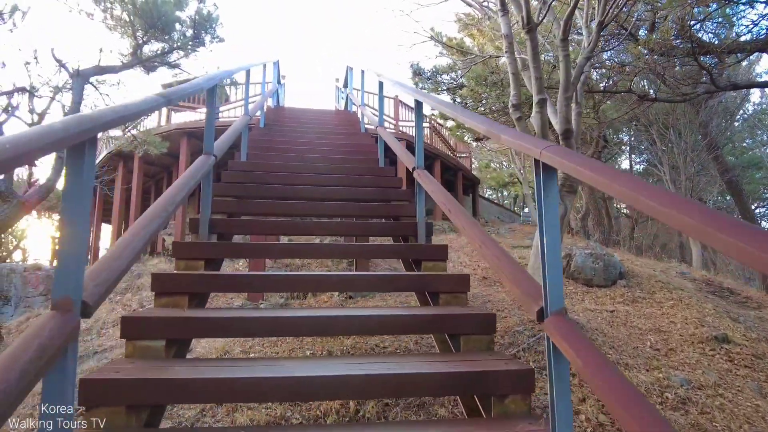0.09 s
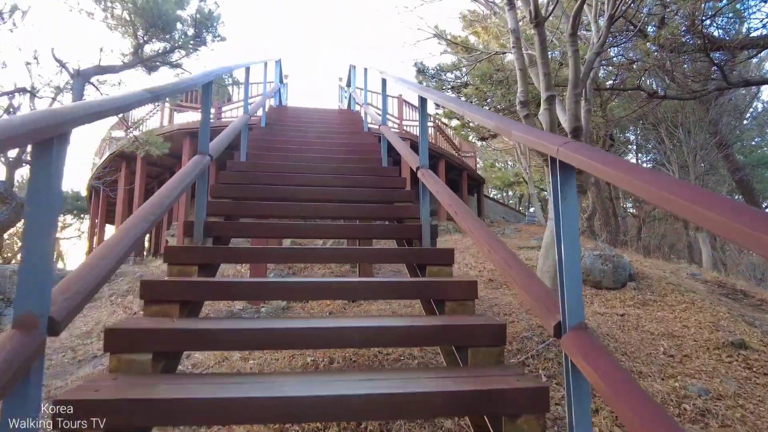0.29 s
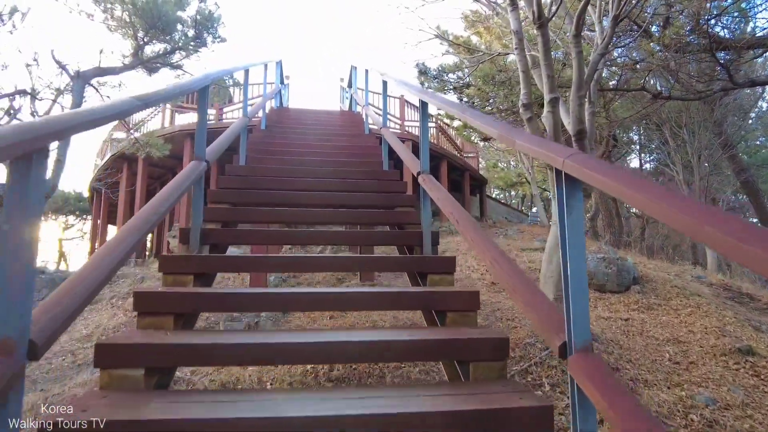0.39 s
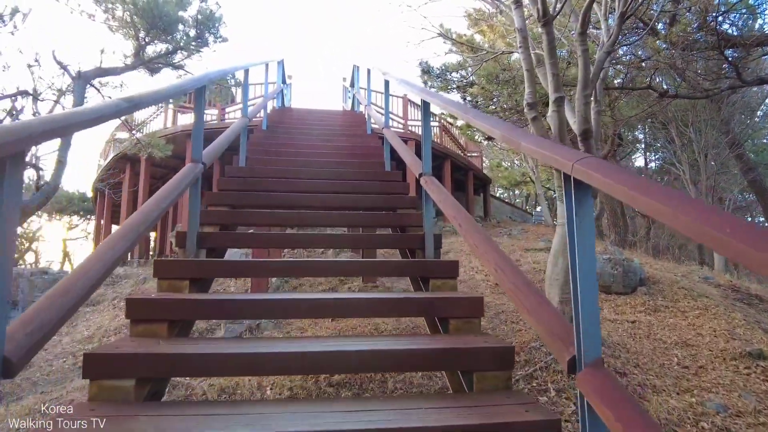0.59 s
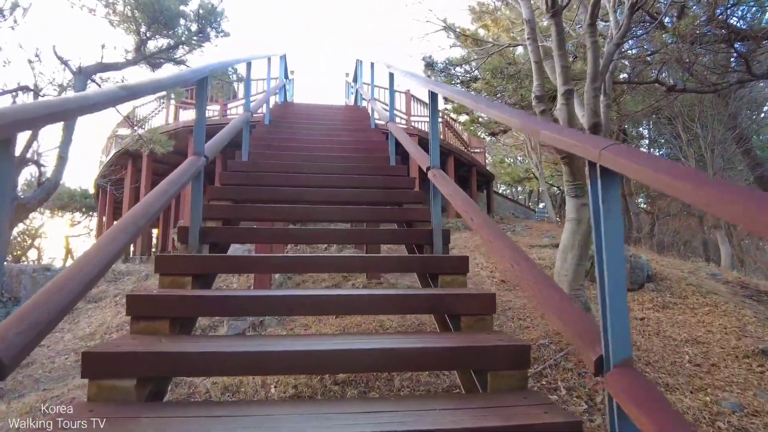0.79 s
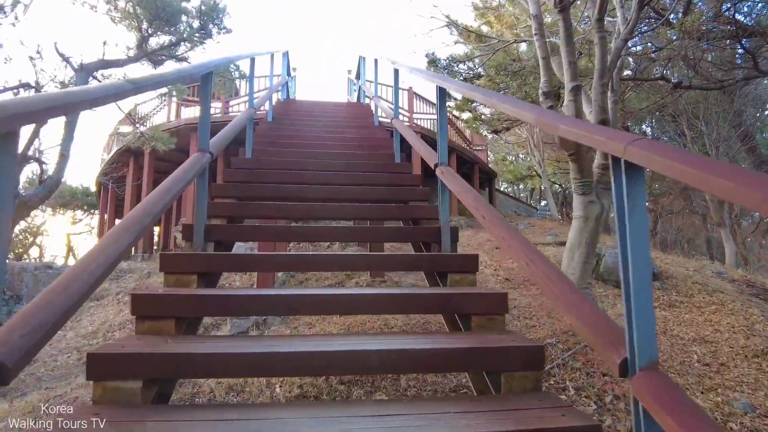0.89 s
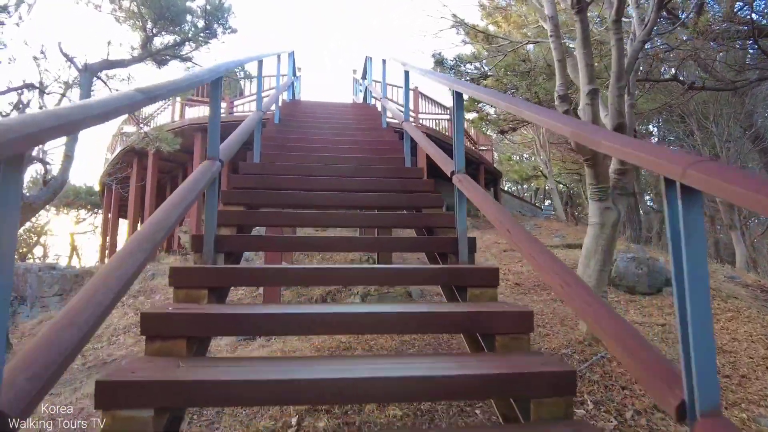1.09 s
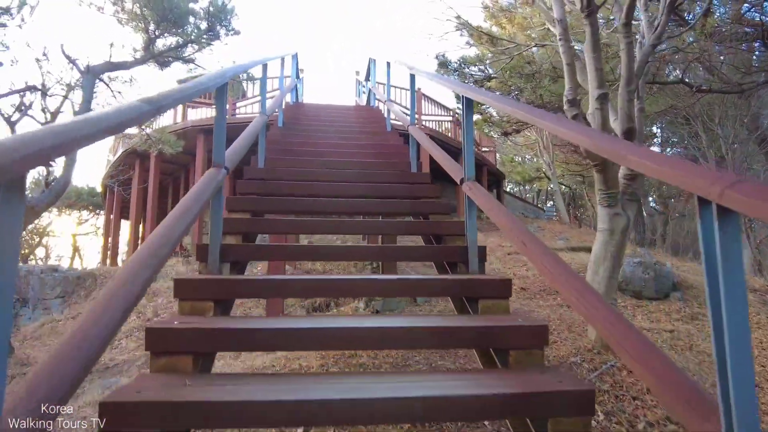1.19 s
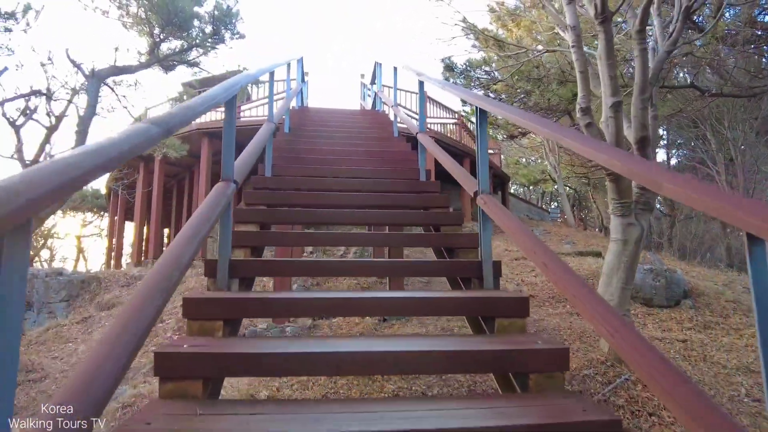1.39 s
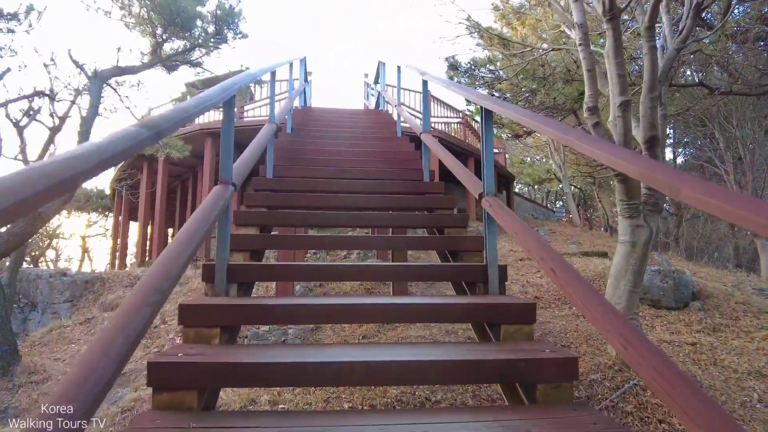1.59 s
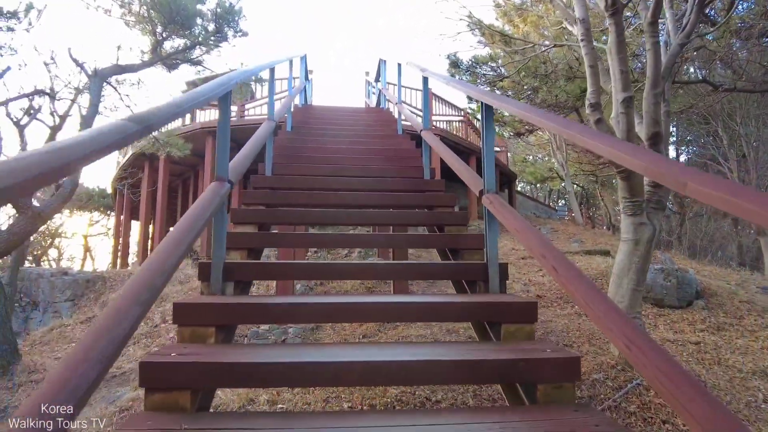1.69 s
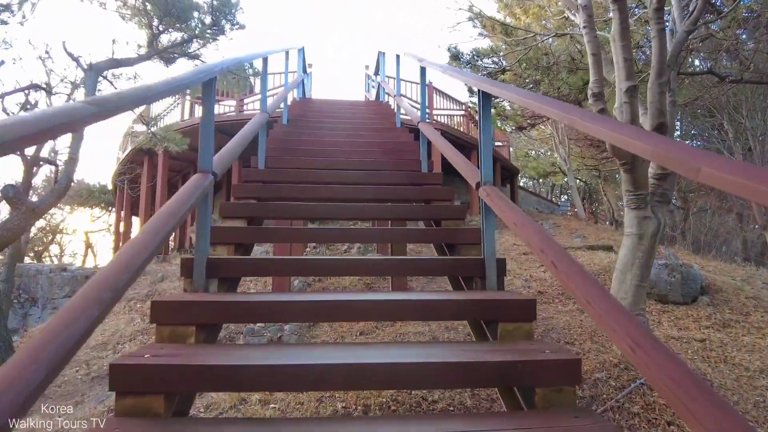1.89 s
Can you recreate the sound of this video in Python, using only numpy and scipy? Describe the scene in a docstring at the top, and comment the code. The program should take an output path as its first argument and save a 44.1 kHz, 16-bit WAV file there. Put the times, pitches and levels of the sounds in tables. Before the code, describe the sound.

Someone climbs open timber stairs on a hillside: a hollow knock, a softer duller one, then another solid one, with close fabric rustle, small gritty clicks and faint far rumble, heard from the walker's position.

```python
"""Boots climb an open wooden staircase on a hillside, heard by a stereo pair above the steps.
Each knock rings the hollow tread as damped modes with a noisy scuff; body weight booms the long beams.
Close by, trouser and jacket fabric swishes with the strides, as grainy noise of moving level and brightness.
Grit ticks in bursts a few cycles long, and shaped noise makes a far low rumble under faint air."""
import sys
import numpy as np
from scipy import signal
from scipy.fft import rfft, irfft, next_fast_len
from scipy.io import wavfile
from scipy.ndimage import uniform_filter1d, map_coordinates

SR = 44100
rng = np.random.default_rng(int(sys.argv[2]) if len(sys.argv) > 2 else 0)


def attenuation_scalar(level_db):
    """Turn a level in dB into a linear amplitude multiplier (20 dB per decade)."""
    decades = np.asarray(level_db, float) / 20
    return 10 ** decades


def to_wav(sig):
    """Store sig (one row per channel, or 1-D mono) as 16-bit WAV at the path in sys.argv[1].

    Samples outside -1..1 are clipped; the rate is SR.
    """
    pcm = np.clip(np.atleast_2d(sig), -1, 1) * 32767
    pcm = np.round(pcm).astype(np.int16)
    wavfile.write(sys.argv[1], SR, pcm.T)  # frames by channels


N = 83790  # length in samples, 1.9 s


def unit(x):
    """Scale to rms 1."""
    return x / np.sqrt(np.mean(x ** 2) + 1e-20)


def along(points, hz):
    """Read a curve of (Hz, value) points on a logarithmic frequency axis."""
    point_hz, value = np.transpose(points)
    return np.interp(np.log(hz + 1), np.log(point_hz + 1), value)


def filtered(x, response):
    """Multiply the spectrum of x by a complex response of frequency."""
    size = next_fast_len(N + SR // 2)
    spectrum = rfft(x, size) * response(np.fft.rfftfreq(size, 1 / SR))
    return irfft(spectrum, size)[..., :N]


def rush(spectrum, side_points, patchy_db, slope_db, treble_db):
    """Mid and side noise with random patches, a moving tilt (dB per octave about 3 kHz) and moving treble."""
    treble_hz = 8500
    u = np.arange(N) / SR
    hz, t, z = signal.stft(rng.standard_normal((2, N)), SR, nperseg=512)
    patches = uniform_filter1d(rng.standard_normal(z.shape[1:]), size=6, axis=0)
    patches = unit(uniform_filter1d(patches, size=6, axis=1))
    octaves = np.log2(np.clip(hz, 300, None) / 3000)
    tilt = np.outer(octaves, np.interp(t, u, slope_db))
    shelf = hz ** 6 / (hz ** 6 + treble_hz ** 6)
    treble = np.outer(shelf, np.interp(t, u, treble_db))
    pair = signal.istft(z * attenuation_scalar(patchy_db * patches + tilt + treble), nperseg=512)[1][:, :N]
    # The second row, the side, also takes the side-over-mid curve.
    pair = filtered(pair, lambda f: attenuation_scalar(along(spectrum, f) + np.outer([0, 1], along(side_points, f))))
    return pair / pair[0].std()


def rumble_and_air():
    """A far rumble over faint air noise: steady noise shaped in frequency and stereo width."""
    # Each row: frequency in Hz, relative density in dB per Hz.
    air_spectrum = [(12, -31), (20, -6), (64, 1), (78, -4.5), (92, -14), (202, -18.5), (238, -21.5),
                    (289, -28), (439, -25.5), (505, -33), (565, -37), (1160, -46), (1410, -41),
                    (1670, -44.5), (15500, -68)]
    # Stereo spread of the air. Each row: frequency in Hz, side over mid in dB.
    air_side = [(30, -38.5), (100, -41.5), (225, -26.5), (600, -13.5), (900, -7.5), (1400, -6.5),
                (2500, -5.5), (15000, -2)]
    still = np.zeros(N)
    mid, side = attenuation_scalar(-47.5) * rush(air_spectrum, air_side, patchy_db=0.0, slope_db=still, treble_db=still)
    return np.array([mid + side, mid - side])


def swish():
    """Fabric rubbing: grainy hiss that swells with the strides, leaning left and varying in width."""
    # Strokes of the fabric. Each row: time in seconds, relative level in dB, brightness in dB per octave.
    strokes = [(0, -63, -2.8), (.03, -75, -3.3), (.075, -65, -2), (0.144, -60, -1), (.21, -57.5, -0.2),
               (.28, -61, -1.6), (.4, -65.5, -4), (.49, -85, 2.5), (0.549, -64, -3), (.61, -58.5, -1.5),
               (.7, -53, -0.3), (0.776, -58, -3.5), (0.831, -73.5, -1.8), (1.06, -72, -1.8),
               (1.12, -65.5, -0.8), (1.17, -63, -3.6), (1.21, -76, 1.5), (1.375, -88.5, 10.2),
               (1.405, -65.5, -4), (1.47, -67.5, -1), (1.51, -66.5, 3.5), (1.64, -71, 3.5),
               (1.69, -80.5, 3), (1.78, -65, -0.5), (1.83, -65, 1), (1.86, -59.5, 2.5), (1.9, -55, 7.5)]
    # Hiss of the cloth before brightness moves it. Each row: frequency in Hz, relative density in dB per Hz.
    cloth = [(290, -50), (500, -10), (1100, -11), (1300, -6), (1800, -8), (2300, -10), (4250, -12.5),
             (7000, -17.5), (9500, -24), (13000, -25), (15500, -24)]
    # Stereo spread of the hiss before the width moves it. Each row: frequency in Hz, side over mid in dB.
    cloth_side = [(300, -24), (1000, -11.5), (1600, -13.5), (2500, -3), (5000, -4.5), (9000, -1),
                  (14000, -2.5)]
    # Stereo width as the fabric moves. Each row: time in seconds, side gain in dB.
    width = [(0, .1), (.4, 1.5), (.56, 1), (.7, -1.5), (.73, -6), (1.2, -12), (1.39, -3.5), (1.5, 3),
             (1.54, -2), (1.72, -4), (1.8, 0.7), (1.9, 2)]
    # Treble against the body of the swish. Each row: time in seconds, treble gain in dB.
    sheen = [(0, 8), (.075, 4), (.14, 7.5), (.2, 1.5), (.55, 2.5), (.7, -1), (.78, 2.5), (1.12, 2.5),
             (1.2, 3.5), (1.4, -2), (1.52, -1), (1.7, 6), (1.84, -1), (1.9, -17.5)]
    grain_db, left_share, grain_samples = 1.5, 0.12, 60
    t = np.arange(N) / SR
    stroke_s, stroke_db, stroke_slope = np.transpose(strokes)
    level_db = np.interp(t, stroke_s, stroke_db)
    slope_db = np.interp(t, stroke_s, stroke_slope)
    treble_db = np.interp(t, *np.transpose(sheen))
    # Random level points, joined smoothly
    grain = map_coordinates(rng.standard_normal(N // grain_samples + 4), [np.arange(N) / grain_samples])
    hiss = rush(cloth, cloth_side, patchy_db=1.5, slope_db=slope_db, treble_db=treble_db)
    mid, side = attenuation_scalar(level_db + grain_db * grain) * hiss
    side = attenuation_scalar(np.interp(t, *np.transpose(width))) * (side + left_share * mid)
    return np.array([mid + side, mid - side])


def echo(x):
    """A short open-air answer from rails and slope: noise that dies away sooner at high frequencies."""
    # Each row: frequency in Hz, 60 dB decay time in seconds.
    echo_t60 = [(200, .25), (1000, 0.13), (5000, 0.067)]
    hz, t, z = signal.stft(rng.standard_normal((2, SR // 3)), SR, nperseg=256)
    decay = attenuation_scalar(-60 * t / along(echo_t60, hz)[:, None])
    tail = signal.istft(z * decay * (hz[:, None] > 200), SR, nperseg=256)[1]
    tail = tail / np.linalg.norm(tail[0])
    delayed = np.pad(x, (200, 0))  # samples, 4.5 ms
    return signal.fftconvolve(delayed[None], tail, axes=1)[:, :N]


def grit():
    """Tiny ticks a few cycles long: each a sine under a quick rise and fall."""
    # Each row: start in seconds, envelope peak in dB, frequency in Hz, rise in cycles.
    ticks = [(.078, -57.5, 1460, 0.97), (.352, -55, 3020, 3.2), (0.778, -43, 1360, 0.55),
             (1.046, -52.5, 1530, 1.04), (1.149, -58, 3000, 0.26), (1.318, -61, 2870, 0.98),
             (1.572, -56, 1466, 1.64), (1.579, -42.5, 1990, 0.1), (1.676, -66, 8100, 3.6),
             (1.737, -64.5, 7500, 2.2)]
    out, t = np.zeros(N + SR), np.arange(SR // 50) / SR
    for s, db, hz, cycles in ticks:
        rise = t * hz / cycles
        envelope = np.e * rise * np.exp(-rise)
        out[round(s * SR):][:len(t)] += attenuation_scalar(db) * envelope * np.sin(2 * np.pi * hz * t)
    return out[:N]


def ring(modes, s, db, centre_hz, fall_db, share, rise, pitch=1, alternate=False):
    """Damped modes struck at s seconds, weighted about centre_hz; neighbours may radiate in opposite polarity."""
    hz, level, t60 = np.transpose(modes)[..., None]
    # Time since the strike, exact to a fraction of a sample
    t = np.clip(np.arange(SR // 2) / SR + round(s * SR) / SR - s, 0, None)
    colour_db = -fall_db * np.log2(hz * pitch / centre_hz) ** 2
    gain = attenuation_scalar(level + colour_db - 60 * t / (t60 * share))
    sign = (-1.) ** np.arange(len(hz))[:, None] if alternate else 1
    modes_sum = np.sum(sign * gain * np.sin(2 * np.pi * hz * pitch * t), axis=0)
    attack = (1 - np.exp(-t * centre_hz / rise)) ** 2  # rise in cycles of centre_hz
    wave = -attack * modes_sum
    return np.pad(attenuation_scalar(db) * wave / np.abs(wave).max(), (round(s * SR), N))[:N]


def beam_thumps():
    """Body weight sets the long beams of the stair booming as low damped modes."""
    # Long beams. Each row: frequency in Hz, relative level in dB, 60 dB decay in seconds at a length share of 1.
    beams = [(77.8, -18.5, 0.2), (108.3, -9.5, 0.52), (114.7, 4.5, 0.49), (125.3, 7, 0.14),
             (145.9, -9.5, 0.6), (189, -33, 0.11)]
    # Body weight. Each row: time in seconds, peak in dB, colour centre in Hz, ring length share.
    thumps = [(0.2236, -21, 134, 1.03), (0.2554, -24, 99, 0.4), (0.294, -30.5, 113, 0.42),
              (.347, -37.5, 110, 0.48), (1.1, -34.5, 105.3, 1.2), (1.269, -46.5, 103, 0.2),
              (1.486, -25.5, 125, 0.58), (1.506, -31, 120, 0.28), (1.671, -42.5, 117, 0.85)]
    # Colour falls by 51 dB per octave squared.
    return sum(ring(beams, s, db, hz, 51, share, rise=0.17) for s, db, hz, share in thumps)


def scuff(white, s, centre_hz):
    """The sole's noisy contact: band-shaped noise that grows into the knock and dies away after it."""
    rise_s, t60_s = 0.011, 0.16
    top_hz = centre_hz * 1.5
    noise = unit(filtered(white, lambda f: f / (f + 300) / (1 + (f / top_hz) ** 4)))
    since = np.arange(N) / SR - s
    before = np.exp(np.minimum(since, 0) / rise_s)
    after = attenuation_scalar(-60 * np.abs(since) / t60_s)
    return np.where(since < 0, before, after) * noise


def boot_knocks():
    """Each knock rings the tread board and scuffs, reaching one microphone slightly before the other."""
    # Tread board at pitch ratio 1 and length share 1. Each row: frequency in Hz, relative level in dB,
    # 60 dB decay in seconds.
    tread = [(200, -15, 0.069), (243.3, 6, 0.15), (402.6, 11, 0.064), (509, 1.5, 0.031),
             (582.6, 3.5, 0.053), (743, -5, 0.042), (918, 2, 0.018), (907, -9.5, 0.079),
             (1046, -0.5, 0.037), (1330, -40, .03), (1554, -4, 0.075), (2200, -11.5, 0.022),
             (2630, -6.5, 0.018), (3150, -10, 0.021)]
    # Boot knocks. Each row: time in seconds, ring peak in dB, tread pitch ratio, colour centre in Hz,
    # colour fall in dB per octave squared, ring length share, left lead in ms (negative: right leads).
    knocks = [(.2256, -26, 1.115, 2190, 3, 0.64, 0.075), (0.2269, -16.5, 1.084, 912, 15, 0.34, 0.062),
              (.348, -47.5, 1.115, 1520, 8, 0.67, 0.12), (1.0749, -32, .875, 323, -1, 0.067, 0.072),
              (1.0799, -36.5, .875, 690, -1, 0.23, 0.066), (1.0869, -23.5, .875, 970, 5, 0.39, 0.073),
              (1.276, -49, .875, 200, 6, 0.54, 0.11), (1.4833, -21, 1.001, 553, 10.5, 0.63, -0.097),
              (1.4899, -21.5, 1.001, 444, 7.5, 0.62, -0.14), (1.51, -33, 1.001, 328, 2, 0.82, -0.057)]
    scuff_db = -27.5  # against the ring's peak
    out = np.zeros((2, N))
    white = rng.standard_normal(N)
    for s, db, pitch, centre_hz, fall_db, share, lead_ms in knocks:
        board = ring(tread, s, db, centre_hz, fall_db, share, rise=0.3, pitch=pitch, alternate=True)
        knock = board + attenuation_scalar(db + scuff_db) * scuff(white, s, centre_hz)
        # Half the lead advances the left channel, half delays the right.
        out += filtered(knock, lambda f: np.exp(1j * np.pi * np.outer([1, -1], f) * lead_ms / 1000))
    return out


def scene():
    """Steps below the microphone pair, fabric close by, rumble all round."""
    steps = boot_knocks() + beam_thumps() + grit()
    return steps + attenuation_scalar(-31) * echo(steps.mean(axis=0)) + swish() + rumble_and_air()


def band_limit(x):
    """A steep low-pass at the top of the band."""
    return signal.sosfilt(signal.butter(12, 16810, fs=SR, output="sos"), x)


def record(dry):
    """The recorder widens the low stereo image by lifting the side signal below a crossover."""
    # Each row: frequency in Hz, side gain in dB.
    widen = [(60, 21.5), (300, 14), (800, 11), (1170, 12), (1240, 1.7)]
    mid = (dry[0] + dry[1]) / 2
    side = filtered((dry[0] - dry[1]) / 2, lambda f: attenuation_scalar(along(widen, f)))
    return band_limit(np.array([mid + side, mid - side]))


dry = scene()
out = record(dry)
to_wav(out)
```